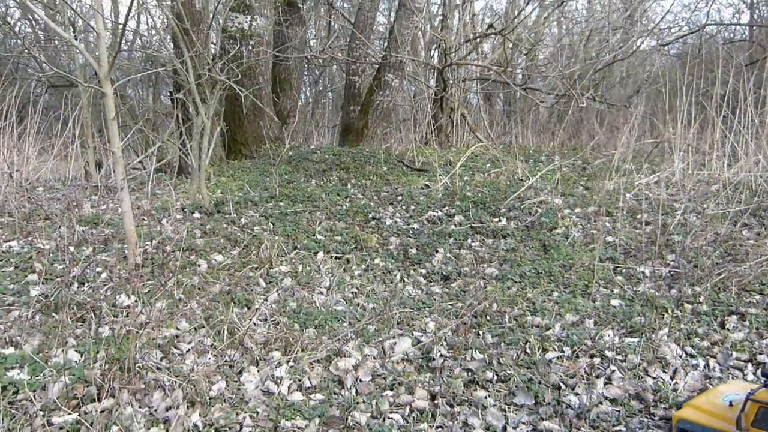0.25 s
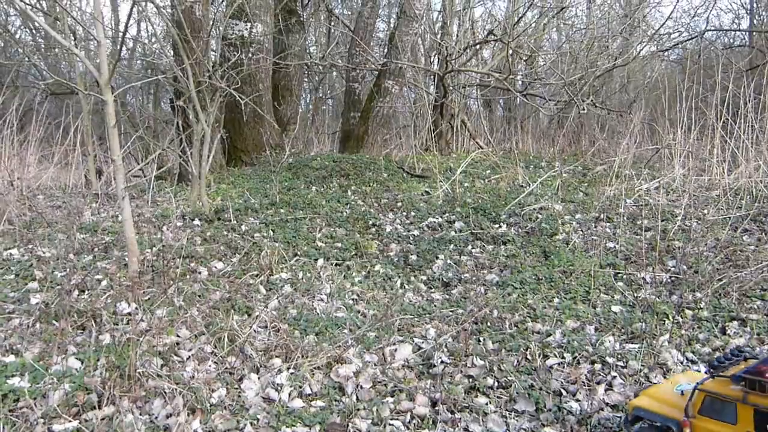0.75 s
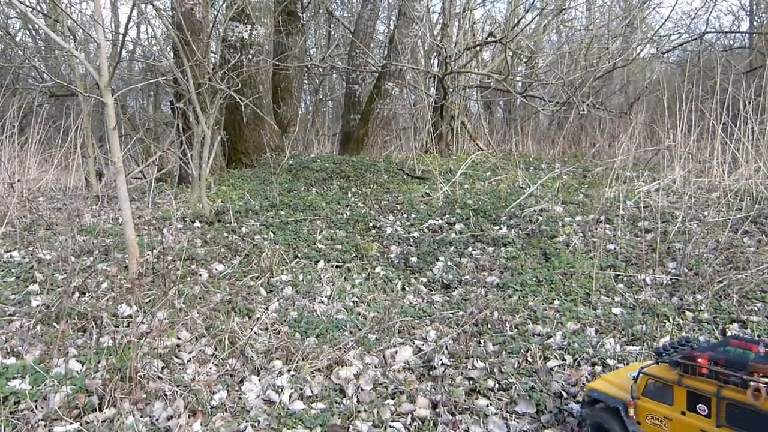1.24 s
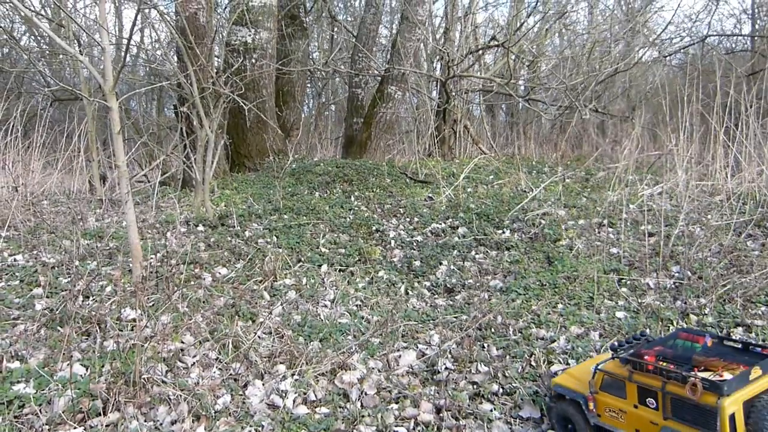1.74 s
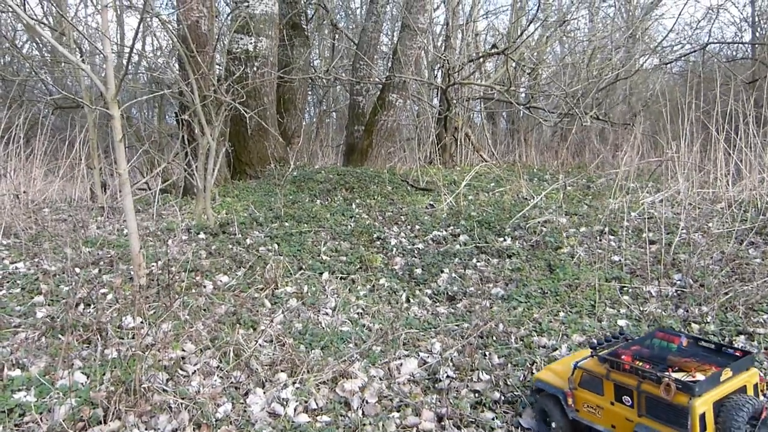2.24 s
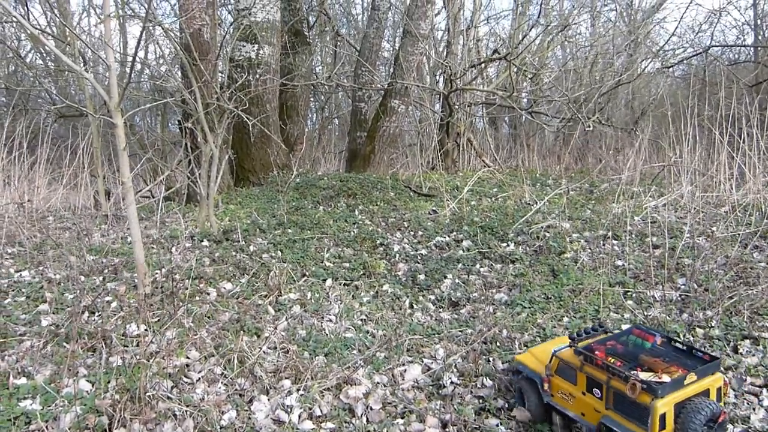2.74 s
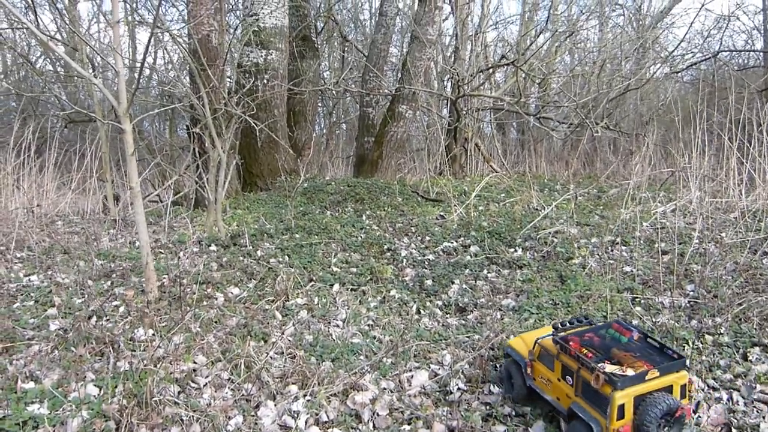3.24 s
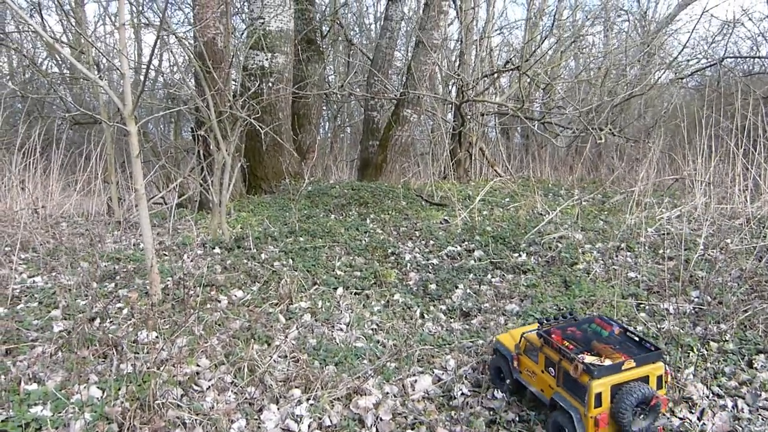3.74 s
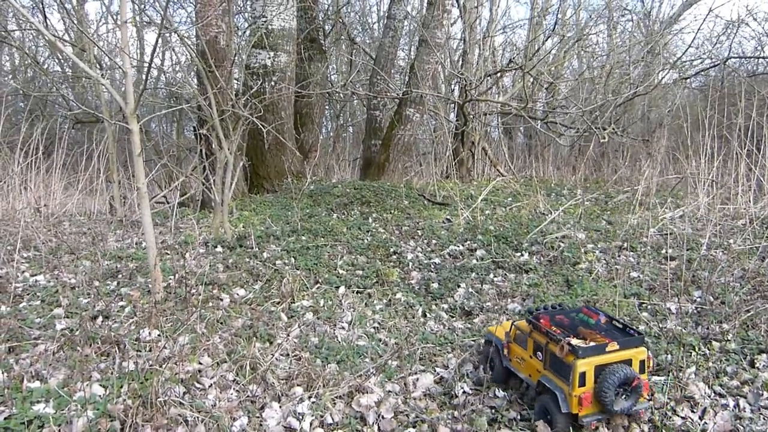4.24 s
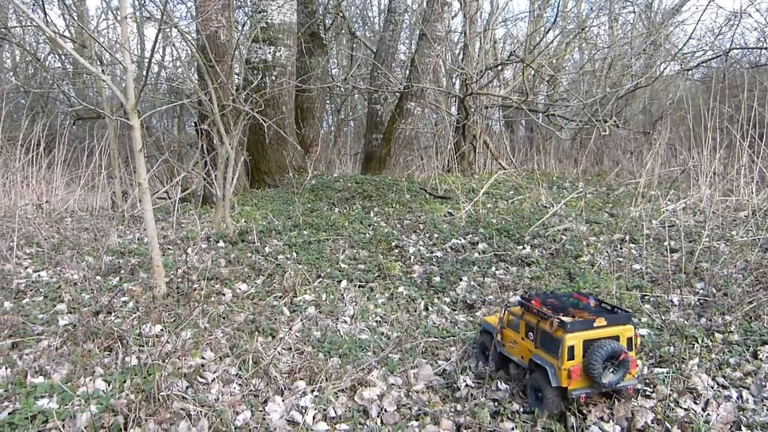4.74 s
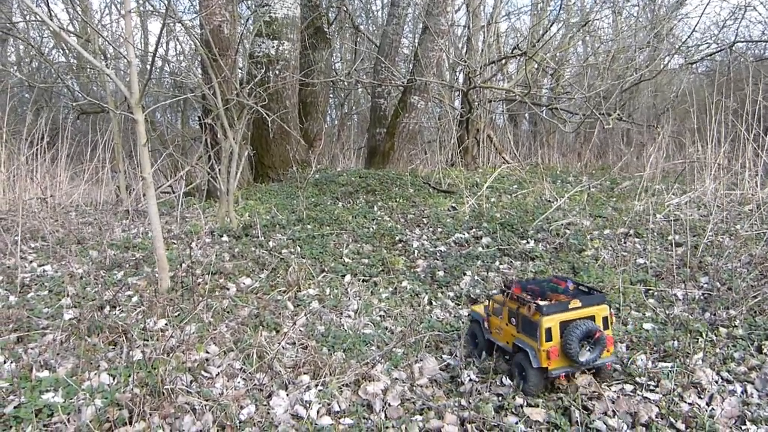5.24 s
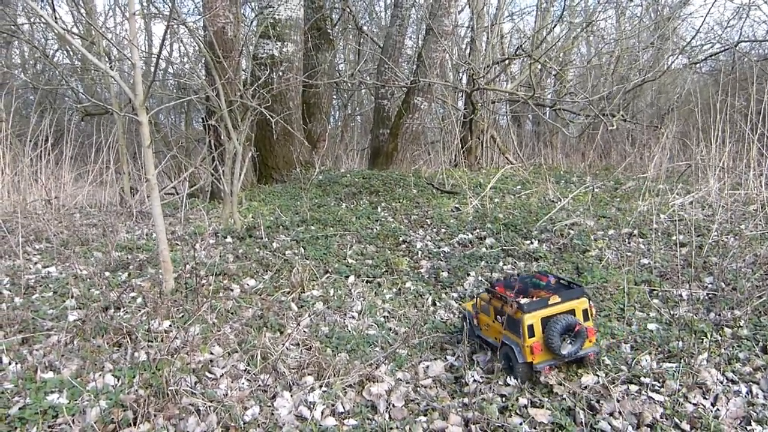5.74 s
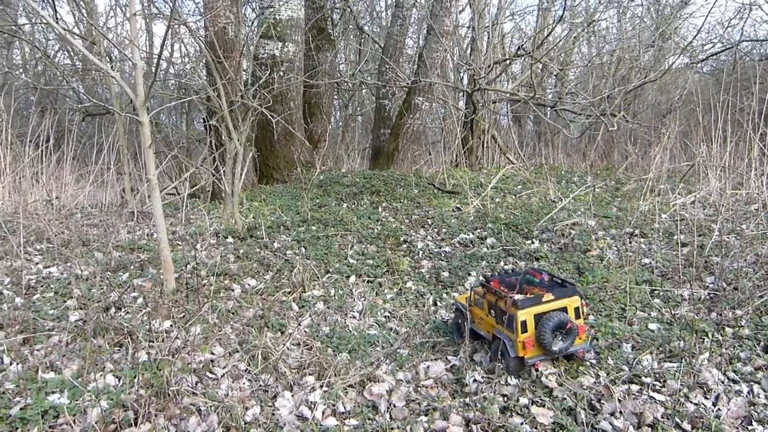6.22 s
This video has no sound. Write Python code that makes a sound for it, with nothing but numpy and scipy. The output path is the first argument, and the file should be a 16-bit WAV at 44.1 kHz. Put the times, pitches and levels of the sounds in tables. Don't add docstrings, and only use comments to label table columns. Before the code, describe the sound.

A small radio-controlled truck rolls over dry leaves in open woodland, close to a stereo microphone. Continuous crisp rustling swells and dips, full of bright snaps, tiny ticks and duller stalk cracks. A soft low gear whirr fades as it moves ahead. Light wind flutters early, an insect buzzes briefly just after two seconds, and strong low buffeting arrives past four seconds while the crackling continues.

```python
import sys
import numpy as np
from scipy import signal
from scipy.fft import rfft, irfft
from scipy.io import wavfile
from scipy.ndimage import uniform_filter1d

SR = 44100
rng = np.random.default_rng(int(sys.argv[2]) if len(sys.argv) > 2 else 0)


def bounce(signal):
    frames = np.transpose(np.atleast_2d(signal))
    limited = np.clip(frames, -1, 1)
    pcm = np.round(limited * 32767).astype(np.int16)
    wavfile.write(sys.argv[1], SR, pcm)


def magnitude_from_level(level_db):
    exponent = np.asarray(level_db, float) / 20
    return 10 ** exponent


N = 285414


def evened(x):
    return x / np.sqrt(np.mean(x ** 2) + 1e-20)


def smooth_noise(samples, passes=1):
    x = rng.standard_normal(N)
    for _ in range(passes):
        x = uniform_filter1d(x, size=samples)
    return evened(x)


def read(points, hz, column=1):
    table = np.transpose(points)
    return np.interp(np.log(hz + 1), np.log(table[0] + 1), table[column])


def curve(rows, column, t=None):
    table = np.transpose(rows)
    return np.interp(np.arange(N) / SR if t is None else t, table[0], table[column])


def ring(x, hz, width_hz):
    return signal.lfilter(*signal.iirpeak(hz, hz / width_hz, SR), x)


def rustle(bearing):
    cracks_per_s, spread_db, clump_db, t60_s = 2200, 2.0, 1.65, 0.0018
    slide_level, slide_hz = 0.73, 10500
    leaf_count = 24
    leaf = rng.integers(0, leaf_count, size=N)
    clumps = smooth_noise(500)
    size = magnitude_from_level(spread_db * np.minimum(rng.exponential(1, N), 3.5))
    size = size * (rng.random(N) < cracks_per_s / SR)

    t = np.arange(500) / SR
    decay = magnitude_from_level(-60 * t / t60_s)
    cracks = np.zeros((2, N))
    for k, shape in enumerate(rng.standard_normal((leaf_count, 2, len(t)))):
        hits = (size * (leaf == k))[None]
        cracks += signal.oaconvolve(hits, shape * decay, axes=1)[:, :N]

    sliding = signal.lfilter(*signal.butter(2, slide_hz, fs=SR), rng.standard_normal((2, N)))
    litter = (slide_level * sliding + evened(cracks)) * magnitude_from_level(clump_db * clumps)
    bright, dull = (p / uniform_filter1d(p[0] ** 2, size=30000) ** .5 for p in housing(litter, bearing))
    steps = np.arange(0, N + 128, 128)
    bright_db, dull_db = (np.interp(np.arange(N), steps, level) for level in tread_db(steps / SR))
    return bright * magnitude_from_level(bright_db) + dull * magnitude_from_level(dull_db)


# start_s, level_db
TREAD_LEVEL = [(0, -38.5), (.55, -40.5), (1.08, -36.5), (1.3, -32), (1.75, -36), (2.4, -35.5), (2.6, -34),
               (2.94, -36), (3.16, -39), (3.4, -33.5), (3.8, -39), (4.3, -37), (4.55, -33.5), (4.7, -38),
               (5.0, -37), (5.45, -35.5), (6.2, -38.5), (6.47, -35.5)]
# centre_s, length_s, swell_db, extra_dull_db
LEAF_HEAPS = [(.07, .1, 5, -5), (0.17, 0.11, 3.5, -1.5), (0.356, 0.18, 3, -0.5), (0.694, 0.16, 4.5, -2),
              (0.937, 0.17, 3.5, -0.5), (1.19, 0.13, 1.5, -0.5), (1.88, 0.23, 2, 0), (2.52, 0.068, 3, 1.5),
              (2.653, 0.13, 4.5, -1), (2.803, 0.14, 3.5, 0), (3.077, .12, 6.5, -1.5),
              (3.278, 0.16, 6.5, -1.5), (3.588, 0.25, 5.5, 1.5), (3.769, 0.08, 4.5, -0.5),
              (3.871, 0.033, 7.5, 0), (3.999, 0.14, 7, -1.5), (4.148, 0.097, 10, -2), (4.387, 0.2, 2.5, 1),
              (4.938, 0.2, 3.5, 0.5), (5.067, 0.17, 2.5, 1.5), (5.376, 0.12, 1.5, 2),
              (5.55, 0.059, 8.5, -2), (5.71, .1, 2, -1.5), (5.97, 0.18, 2, -0.5), (6.277, 0.095, 2, 2.5),
              (6.417, 0.1, 3.5, 5)]


def tread_db(t):
    dull_beside_db, dull_ahead_db = -8.5, -5.5
    s, length, swell_db, dull_db = np.transpose(LEAF_HEAPS)[:, :, None]
    swells = np.exp(-(2 * (t - s) / length) ** 2)
    bright = curve(TREAD_LEVEL, 1, t) + (swell_db * swells).sum(axis=0)
    under = dull_beside_db + (dull_ahead_db - dull_beside_db) * bearing_at(t)
    under = under + (dull_db * swells).sum(axis=0)
    return bright, bright + under


# start_s, bearing_0_beside_1_ahead
TRUCK_BEARING = [(0, 0.24), (.7, 0.36), (1.5, 0.5), (2.4, 0.59), (3.5, 0.86), (5, 0.88), (6.47, 1)]


def bearing_at(t=None):
    return curve(TRUCK_BEARING, 1, t)


# start_s, peak_db, pitch_hz
LEAF_SNAPS = [(.186, -12, 8000), (.5163, -16, 7350), (.7127, -15, 6720), (1.1666, -12, 6020),
              (1.1728, -12.5, 6160), (1.2183, -11, 8720), (1.2241, -8.5, 6800), (1.2668, -11, 7820),
              (1.4686, -9.5, 6940), (2.6814, -9, 8300), (2.7841, -7.5, 5900), (2.809, -13, 7840),
              (2.8242, -10.5, 5800), (2.8872, -11.5, 7700), (3.1055, -15, 7400), (3.1148, -4.5, 8100),
              (3.2505, -13, 7100), (3.2789, -8.5, 7600), (3.3028, -13.5, 8850), (3.6372, -11.5, 7450),
              (3.9497, -12.5, 6300), (4.1017, -14.5, 7750), (4.1507, -12, 8100), (4.2205, -10, 7800),
              (4.3308, -12.5, 9600), (4.4773, -14, 7560), (4.523, -8, 7840), (4.5294, -11, 7900),
              (5.0677, -12, 7030), (5.5541, -18, 7690)]
# start_s, peak_db, pitch_hz
STALK_CRACKS = [(.346, -30, 2800), (.36, -29, 1660), (.7132, -24, 3060), (.898, -36, 4530),
                (1.0428, -24, 2900), (1.1546, -21, 2100), (1.1736, -21, 1430), (1.2191, -22, 2860),
                (1.4038, -23.5, 2700), (1.5792, -23.5, 2880), (1.8275, -27, 2090), (1.9542, -22.5, 2270),
                (2.0428, -27, 2320), (2.1823, -24.5, 3540), (2.4833, -24, 3850), (2.7849, -21, 2200),
                (2.9968, -12, 3100), (3.018, -23.5, 990), (3.1156, -21.5, 1810), (3.2382, -20, 3240),
                (3.2626, -29, 2146), (4.1016, -18, 2950), (4.127, -22, 3250), (4.2206, -16, 3576),
                (4.3854, -24.5, 2970), (4.5228, -16.5, 2510), (4.5305, -14.5, 2490), (5.0685, -26, 4180),
                (5.6134, -27, 2630), (6.4701, -15, 2850)]


def snaps(bearing):
    bright = bursts(LEAF_SNAPS, bearing, part=0, t60_s=0.0044, width_hz=2000, tone=3.9,
                    leak_db=-14.5, tail_db=-16, tail_t60_s=0.023)
    brief = bursts(ticks(), bearing, part=0, t60_s=0.0028, width_hz=2500, tone=2.5,
                   leak_db=-15, tail_db=-16.5, tail_t60_s=0.033)
    dull = bursts(STALK_CRACKS, bearing, part=1, t60_s=0.0087, width_hz=530, tone=5.9,
                  leak_db=0, tail_db=-13, tail_t60_s=0.031)
    return bright + brief + dull


# start_s, peak_db
LEAF_TICKS = [(0.362, -18.5), (.3972, -19), (.4428, -17), (0.5835, -17.5), (.7602, -14), (0.8345, -14.5),
              (.898, -14), (.9558, -15.5), (1.001, -15.5), (1.3789, -19), (1.5883, -13), (1.9562, -19),
              (2.0422, -17), (.5347, -15), (2.4519, -13), (2.614, -16), (2.9589, -15), (3.0651, -15.5),
              (5.1981, -19), (3.5116, -15.5), (4.3937, -14.5), (4.4678, -11.5), (4.5622, -13), (5.049, -15),
              (5.1303, -15), (5.16, -19), (5.4884, -13), (5.8395, -16), (6.271, -18.5), (6.4702, -18)]


def ticks():
    stray_count = 64
    beside_db, ahead_db, spread_db = 11, 9.5, 8.5
    beside_hz, ahead_hz, scatter_hz = 6590, 8100, 910
    when, size = rng.random((stray_count, 2)).T
    s = when * (N - 1) / SR
    over_db = beside_db + (ahead_db - beside_db) * bearing_at(s) + spread_db * size
    rows = np.r_[LEAF_TICKS, np.c_[s, tread_db(s)[0] + over_db]]
    hz = beside_hz + (ahead_hz - beside_hz) * bearing_at(rows[:, 0])
    return np.c_[rows, hz + scatter_hz * rng.uniform(-1, 1, len(rows))]


def bursts(events, bearing, part, t60_s, width_hz, tone, leak_db, tail_db, tail_t60_s):
    t = np.arange(1000) / SR
    out = np.zeros((2, N + len(t)))
    rise = 1 - np.exp(-t / 0.00032)
    envelope = rise * (magnitude_from_level(-60 * t / t60_s) + magnitude_from_level(tail_db - 60 * t / tail_t60_s))
    for (s, db, hz), noise in zip(events, rng.standard_normal((len(events), 2, len(t)))):
        burst = noise * envelope
        bands = housing(burst + tone * ring(burst, hz, width_hz), bearing[round(s * SR)])
        main, other = (b / abs(b[0]).max() for b in (bands[part], bands[1 - part]))
        at = max(round(s * SR) - abs(main[0]).argmax(), 0)
        out[:, at:at + len(t)] += magnitude_from_level(db) * (main + magnitude_from_level(leak_db) * other)
    return out[:, :N]


# freq_hz, density_db_per_hz
BESIDE_COLOUR = [(150, -75), (1000, -11), (1800, -2.5), (2400, -7), (3400, -20.5), (4050, -6), (4600, -10),
                 (5200, -6), (6800, 0), (7900, -5.5), (9000, -21), (11500, -12), (13500, -21.5),
                 (16000, -29.5)]
# freq_hz, density_db_per_hz
AHEAD_COLOUR = [(150, -74), (1000, -15), (1700, -6.5), (2700, -3), (3900, -7), (4400, -14), (5300, -14),
                (6200, -9.5), (7000, -1), (8000, 0), (9300, -2.5), (10800, -11.5), (12000, -24),
                (16000, -32)]


def housing(x, bearing):
    split_hz, notch_hz = 4160, 4400
    hz = np.fft.rfftfreq(2048, 1 / SR)
    beside, ahead = (signal.oaconvolve(x, causal(read(colour, hz))[None], axes=1)[:, :x.shape[1]]
                     for colour in (BESIDE_COLOUR, AHEAD_COLOUR))
    coloured = (1 - bearing) * beside + bearing * ahead
    coloured = coloured - 0.41 * ring(coloured, notch_hz, 300)
    return [signal.sosfilt(signal.butter(4, split_hz, side, fs=SR, output="sos"), coloured)
            for side in ("high", "low")]


def causal(db):
    log_gain = np.log(magnitude_from_level(np.maximum(db, -100)))
    full = np.r_[log_gain, log_gain[-2:0:-1]]
    spectrum = np.exp(full - 1j * signal.hilbert(full).imag)
    return np.fft.ifft(spectrum).real[:len(db) // 2]


# freq_hz, beside_db, ahead_db, tied_share_0_1, lead_rad
PORT_DIFFERENCE = [(900, -15, -11, 0, 0), (1700, -16, -9, 0.03, 0), (2660, -2, -10, 0.5, -1.96),
                   (4520, -5, -3, 0.63, -0.3), (5400, -14.5, 0.5, 0.43, 1.5), (6600, -21, -7, .25, 0.7),
                   (7470, -15, -4, .55, 2), (8600, -0.5, -4, 0.73, 0), (9600, -9, -8, 0.43, 0.6),
                   (11500, -2, 0, 0.3, -0.3), (13000, -24, 4.5, 0, 10), (16000, -4, -1, .1, -9)]


def ports(leaves, bearing):
    hz = np.fft.rfftfreq(N, 1 / SR)
    tied = np.clip(read(PORT_DIFFERENCE, hz, column=3), 0, 1)
    turn = np.exp(1j * read(PORT_DIFFERENCE, hz, column=4))
    z = np.sqrt(tied) * turn * rfft(leaves[0]) + np.sqrt(1 - tied) * rfft(leaves[1])
    beside, ahead = (irfft(z * magnitude_from_level(read(PORT_DIFFERENCE, hz, column=k)), N) for k in (1, 2))
    return np.array([leaves[0], (1 - bearing) * beside + bearing * ahead])


# freq_hz, density_db_per_hz
GEAR_COLOUR = [(30, -60), (100, -27), (170, -6), (350, -6), (620, 0.5), (1000, -5), (1500, -5.5),
               (2400, -62)]
# start_s, level_db
GEAR_LEVEL = [(0, -44.5), (1.5, -47.5), (3, -47), (4.5, -50), (6.47, -52)]


def gears():
    mesh_hz, throb, side_db, strain_db = 112, 0.051, -6, 1.5
    hz = np.fft.rfftfreq(1024, 1 / SR)
    whirr = evened(shaped(read(GEAR_COLOUR, hz)[:, None] + np.zeros(N // 128 + 9)))
    waver = 1 + 0.12 * smooth_noise(9000)
    whirr *= 1 + throb * np.cos(2 * np.pi * np.cumsum(mesh_hz * waver) / SR)
    strain = smooth_noise(2500, passes=2)
    return whirr * magnitude_from_level(curve(GEAR_LEVEL, 1) + strain_db * strain + 1.0 + [[0.], [side_db]])


def shaped(db_field):
    a, b = rng.standard_normal((db_field.shape[1], 513, 2, 2)).T
    return signal.istft((a + 1j * b) * magnitude_from_level(db_field), nperseg=1024, noverlap=896)[1][:, :N]


# start_s, end_s, pulses_per_s, pitch_hz, width_hz
INSECT_BUZZ = (2.132, 2.295, 64.5, 15200, 700)


def insect():
    level_db, side = -54, .7
    start_s, end_s, per_s, hz, width_hz = INSECT_BUZZ
    t = np.arange(N) / SR - start_s
    pulses = np.exp(-((t * per_s + .5) % 1 - .5) ** 2 / .03)
    pulses = pulses * (t > -.007) * (t < end_s - start_s)
    tone = ring(ring(rng.standard_normal(N), hz, width_hz), hz, width_hz)
    return np.outer([1, side], magnitude_from_level(level_db) * evened(tone) * pulses)


# freq_hz, density_db_per_hz
GUST_COLOUR = [(20, -54), (45, -42), (90, -21.5), (132, -9), (218, -1), (340, -4.5), (490, -4.5),
               (655, -11.5), (900, -16.5), (1600, -35), (2600, -62)]
# freq_hz, gain_db
WIND_IN_SUM = [(30, -10), (80, -11.5), (160, -14), (300, -21), (900, -15.5)]


def wind():
    dulling, knee_hz, bass_hz, bass_lag = 0.59, 330, 210, 0.66
    patchy_db, lumps_db, sum_squeeze, port_cut_hz = 1.5, 2.5, 0.043, 75
    t = np.arange(N // 128 + 9) * 128 / SR
    hz = np.fft.rfftfreq(1024, 1 / SR)
    octaves = np.log2(np.maximum(hz, knee_hz) / knee_hz)
    octaves -= bass_lag * np.log2(bass_hz / np.clip(hz, 40, bass_hz))
    frame_db = gust_db(t)
    force_db = np.interp(np.arange(N) / SR, t, frame_db)
    weakness_db = -17.5 - frame_db

    patches = uniform_filter1d(rng.standard_normal((len(hz), len(t))), size=5, axis=0)
    patches = evened(uniform_filter1d(patches, size=20))
    field_db = read(GUST_COLOUR, hz)[:, None] + patchy_db * patches
    eddies = evened(shaped(field_db - dulling * np.outer(octaves, weakness_db)))
    lumps = smooth_noise(300, passes=2)
    total, difference = eddies * magnitude_from_level(force_db + lumps_db * lumps)

    total *= magnitude_from_level(-sum_squeeze * (force_db + 24.5))
    total = irfft(rfft(total) * magnitude_from_level(read(WIND_IN_SUM, np.fft.rfftfreq(N, 1 / SR))), N)
    difference = signal.lfilter(*signal.butter(2, port_cut_hz, "high", fs=SR), difference)
    return np.array([total, difference])


# arrival_s, level_db, hold_s
GUST_EVENTS = [(0.446, -40, .05), (0.533, -29, .005), (0.658, -44, 0.045), (0.8, -29, 0.061),
               (0.988, -41.5, 0.092), (1.206, -32.5, 0.19), (1.528, -33, 0.11), (1.664, -31.5, 0.016),
               (1.95, -30, 0.073), (2.082, -29, 0.015), (2.415, -43, .005), (2.537, -36, 0.027),
               (2.93, -39, .005), (3.06, -34.5, 0.096), (4.007, -39, .14), (4.187, -30.5, .02),
               (4.239, -20, .005), (4.3, -32, 1.87), (4.433, -29, 0.019), (4.653, -15, .01),
               (4.763, -16, .02), (4.841, -19.5, .26), (5.2, -24, 0.055), (5.404, -24, 0.12),
               (5.508, -17, 0.063), (5.75, -48, 0.018), (5.905, -31, .005), (6.013, -24.5, 0.02),
               (6.25, -28.5, 0.027), (6.448, -21.5, .05)]


def gust_db(t):
    rise_db_per_s, fall_db_per_s, calm_db = 388, 181, -74
    s, db, hold = np.transpose(GUST_EVENTS)[:, :, None]
    level_db = db - rise_db_per_s * np.maximum(s - t, 0)
    level_db = level_db - fall_db_per_s * np.maximum(t - s - hold, 0)
    return 10 * np.log10(magnitude_from_level(2 * calm_db) + magnitude_from_level(2 * level_db).sum(axis=0))


def scene():
    bearing = np.clip(bearing_at(), 0, 1)
    leaves = rustle(bearing) + snaps(bearing)
    total, difference = ports(leaves, bearing) + wind() + gears() + insect()
    return np.array([total + difference, total - difference])


def top_cut(x):
    return signal.sosfilt(signal.butter(12, 16360, fs=SR, output="sos"), x)


def record(dry):
    low_cut_hz, edge_hz = 48, 15780
    limited = signal.lfilter(*signal.butter(2, low_cut_hz, "high", fs=SR), dry)
    band_limit = signal.firwin(401, edge_hz, window=("kaiser", 7), fs=SR)
    limited = signal.oaconvolve(limited, band_limit[None], "same")
    return top_cut(limited)


dry = scene()
out = record(dry)
bounce(out)
```